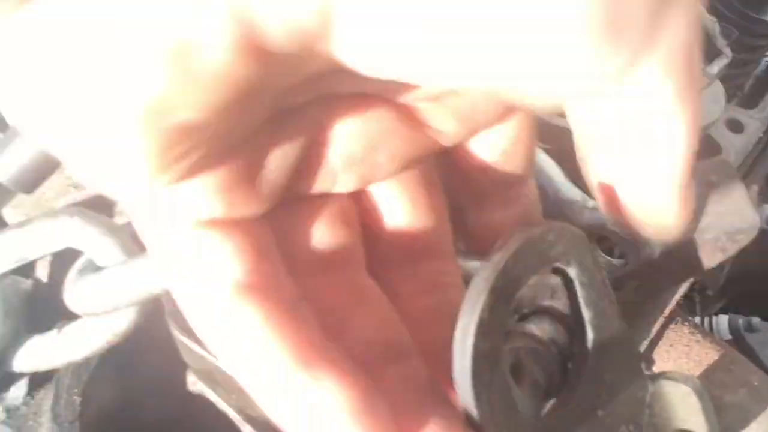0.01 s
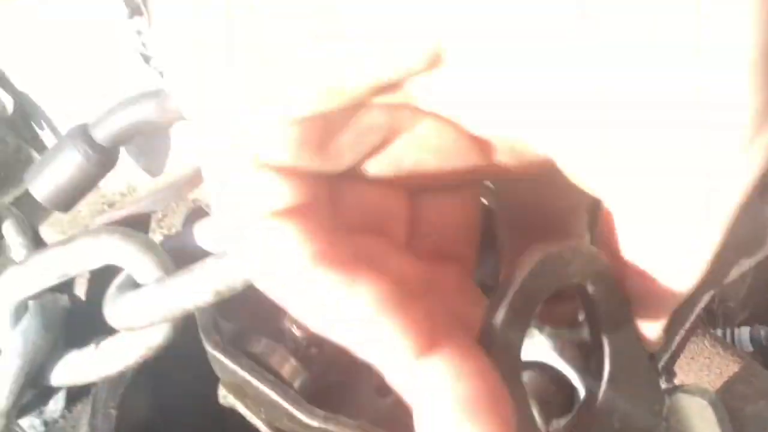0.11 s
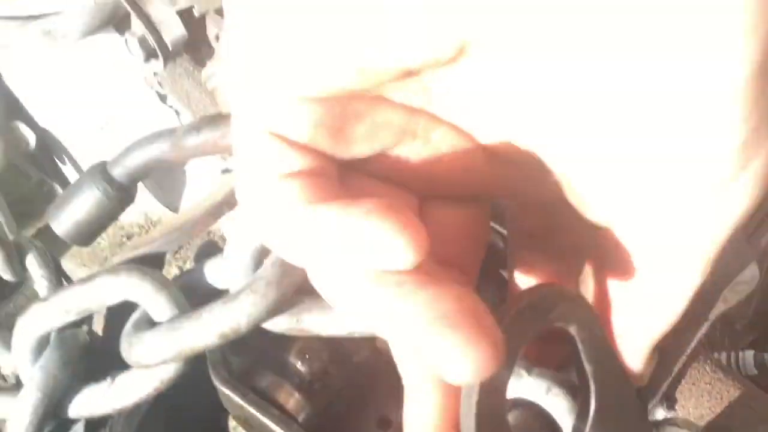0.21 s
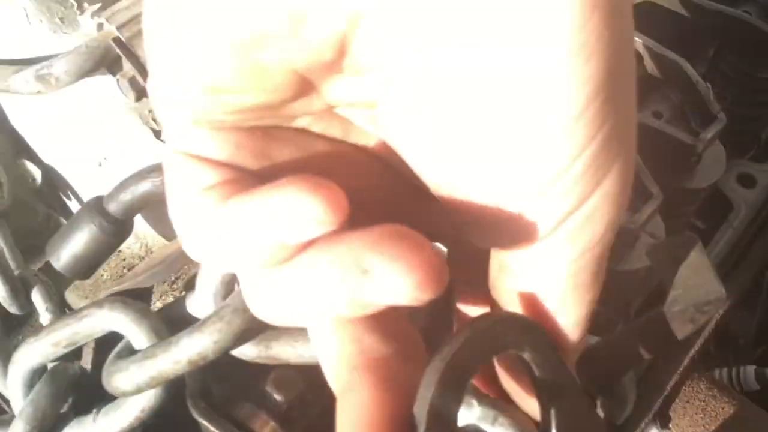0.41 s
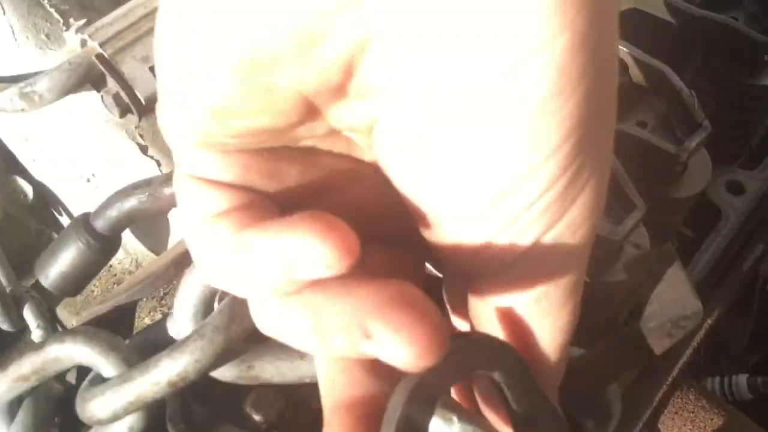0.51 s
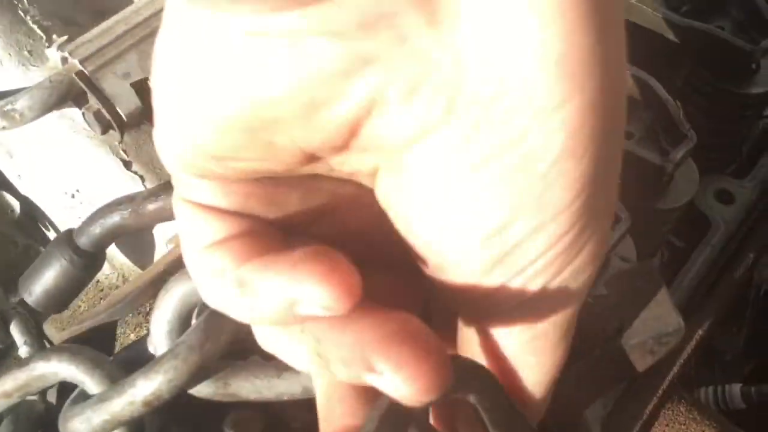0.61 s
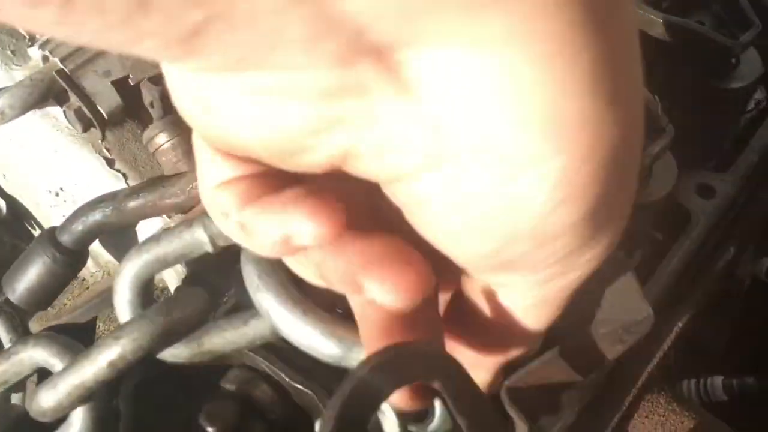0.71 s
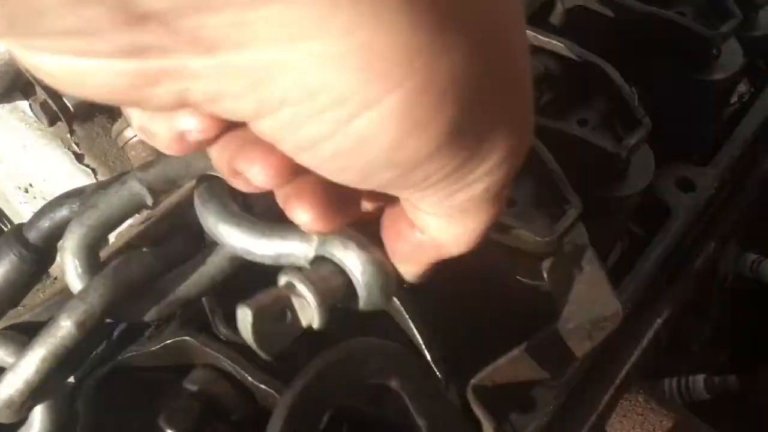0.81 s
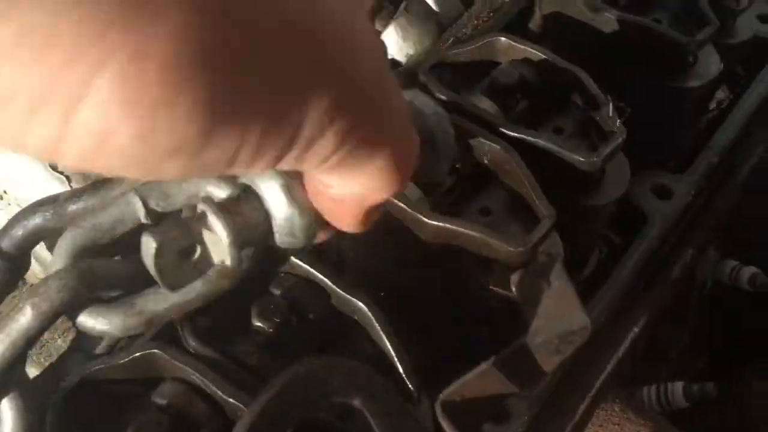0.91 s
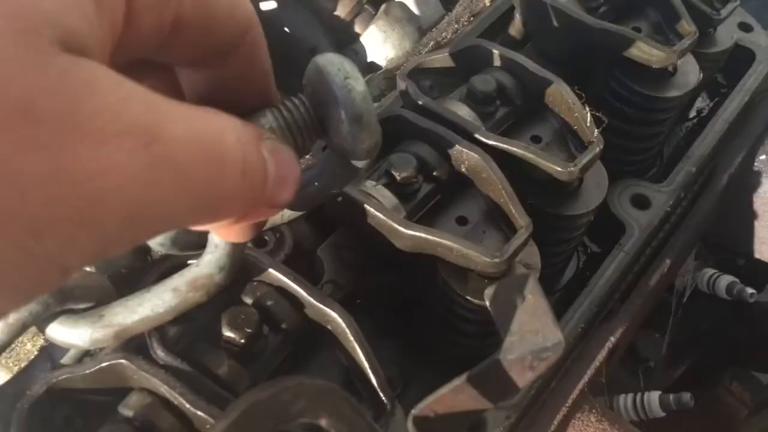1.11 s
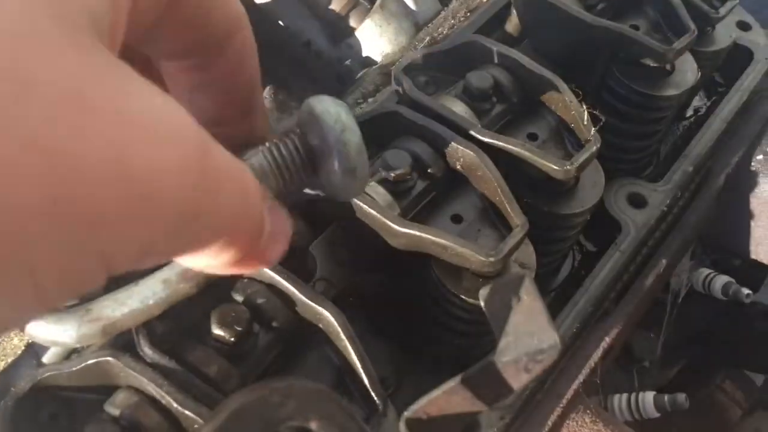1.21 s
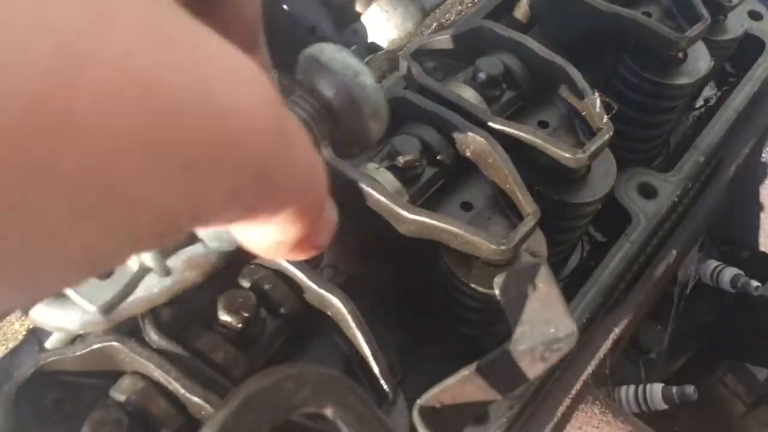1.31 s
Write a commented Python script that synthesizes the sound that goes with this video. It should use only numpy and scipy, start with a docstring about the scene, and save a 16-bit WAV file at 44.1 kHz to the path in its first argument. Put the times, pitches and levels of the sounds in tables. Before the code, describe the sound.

A thick metal chain clanks and grates in uneven bursts as it is handled over an engine.

```python
"""Outdoors, at close range, heavy steel chain links knock and slide on each other over an engine block.
Each blow is a crack of shaped noise plus decaying sine modes of the steel, two of them favoured by
where it was struck. Links in sliding contact give gritty noise in three bands that sings in the same
modes. Heavier contacts thud in the block, the blows echo off it, and a soft rumble lies under all."""
import sys
import numpy as np
from scipy import signal
from scipy.fft import rfft, irfft, next_fast_len
from scipy.io import wavfile
from scipy.ndimage import map_coordinates

SR = 44100
rng = np.random.default_rng(int(sys.argv[2]) if len(sys.argv) > 2 else 0)


def inscribe(sig):
    """Save sig as 16-bit PCM at rate SR to the path in sys.argv[1].

    A 1-D sig is mono; a 2-D sig holds one channel per row.
    Samples are clipped to [-1, 1] before scaling.
    """
    pcm = np.round(np.clip(np.atleast_2d(sig).T, -1, 1) * 32767)
    wavfile.write(sys.argv[1], SR, pcm.astype(np.int16))


def level_to_linear(level):
    """Convert decibel levels to linear amplitude factors, elementwise."""
    exponent = np.asarray(level, float) / 20
    return 10 ** exponent


N = 61740  # samples


def unit(x):
    """Normalisation: scales a signal to rms 1."""
    return x / np.sqrt(np.mean(x ** 2) + 1e-20)


def along(points, hz):
    """Frequency response: gain interpolated in dB over a logarithmic frequency axis."""
    f, db = np.transpose(points)
    return level_to_linear(np.interp(np.log(hz + 1), np.log(f + 1), db))


def noise(n, response):
    """Linear filtering: white noise multiplied by a gain spectrum, brought to rms 1."""
    m = next_fast_len(n + 4096)
    spectrum = rfft(rng.standard_normal(m)) * response(np.fft.rfftfreq(m, 1 / SR))
    return unit(irfft(spectrum, m)[:n])


def wobble(rate):
    """Slow modulation: a smooth curve through random knots, rate of them a second."""
    knots = rng.standard_normal(int(N * rate / SR) + 4)
    return map_coordinates(knots, [np.arange(N) * rate / SR])


# Spectrum of the outdoor rumble: f/Hz, relative level/dB
AIR_SPECTRUM = [(25, -50.5), (60, -26), (80, -11), (97, -2), (120, -8.5), (210, 1), (300, -1), (430, -7.5),
                (700, -10.5), (1200, -8), (1900, -16.5), (2400, -39), (16000, -62)]


def air():
    """Broadband ambient noise: a fixed spectrum whose level wavers gently."""
    level_db = -51.5 + 1.8 * wobble(9.8)
    return level_to_linear(level_db) * noise(N, lambda f: along(AIR_SPECTRUM, f))


# Heavier contacts on the engine block: t/s, level/dB
THUDS = [(0.35, -52), (.445, -39.5), (0.76, -35.5), (.785, -41), (0.822, -40.5), (0.9013, -35),
         (0.9332, -47.5), (1.0103, -51)]


def thuds():
    """Damped resonance: heavier contacts shake the block, heard as decaying noise around its pitch."""
    block_hz, width_hz, t60_s, rise_s = 315, 130, 0.12, 0.0056
    out, t = np.zeros(N + SR), np.arange(SR // 5) / SR
    for start_s, db in THUDS:
        body = noise(len(t), lambda f: f / np.hypot(block_hz ** 2 - f * f, f * width_hz))
        envelope = level_to_linear(db - 60 * t / t60_s) * (1 - np.exp(-t / rise_s))
        out[round(start_s * SR):][:len(t)] += envelope * body
    return out[:N]


# Pitches of the modes of hook and pin, then of the free link: f/Hz
HOOK_HZ = [1090, 1357, 1782, 2180, 2616, 2830, 2960, 3300, 3640, 3860, 4400, 5490, 5950, 6100, 7390, 8600,
           9100, 10949, 11610, 12050, 12490]
LINK_HZ = [4700, 4926, 6390, 6950, 7090, 10060, 10395, 12630, 13735, 15480]
# The same modes in order: relative level/dB, t60/s
HOOK_MODES = [(-17.5, 0.043), (-53.5, 0.77), (-38, 0.19), (-25.5, 0.093), (-15.5, 0.079), (-19.5, 0.037),
              (-13, 0.042), (-12.5, 0.02), (-23.5, 0.051), (-8, 0.035), (-5.5, 0.035), (-4, 0.017),
              (-18, 0.03), (-13.5, 0.012), (-4, 0.032), (-9, 0.027), (-8, 0.026), (-19, 0.12), (-11, 0.064),
              (-22, 0.098), (-27.5, 0.09)]
LINK_MODES = [(-0.5, 0.018), (-21.5, 0.1), (-1, 0.039), (-11, 0.036), (4.5, 0.021), (-1, 0.048),
              (-15, 0.11), (8, 0.036), (-0.5, 0.055), (-5, 0.061)]
MODE_HZ = np.concatenate([HOOK_HZ, LINK_HZ])
MODE_DB, MODE_T60 = np.concatenate([HOOK_MODES, LINK_MODES]).T


def resonances(f, pitches_hz, levels_db, width_hz):
    """Modal superposition: the summed gain of one resonance peak per mode."""
    return sum(level_to_linear(db) / (1 + (2 * (f - hz) / width_hz) ** 2) for hz, db in zip(pitches_hz, levels_db))


# Free-link modes that the bright scrape keeps sounding: f/Hz, level/dB
WHISTLE = [(6390, 1.8), (10200, 4), (12630, 5.3), (15480, 4)]


def whistle(f):
    """Sustained excitation: the gain that sliding adds at the free-link modes."""
    pitches_hz, levels_db = np.transpose(WHISTLE)
    return resonances(f, pitches_hz, levels_db, 250)


# Sliding: t/s, dull rub level/dB, middle level/dB, bright scrape level/dB
SLIDE = [(0, -74, -75, -78), (.05, -70.5, -72.5, -58), (.12, -60.5, -56.5, -51), (.19, -56, -61.5, -60),
         (.26, -57, -65.5, -58.5), (.33, -63.5, -81, -74), (.37, -46.5, -67, -62), (.42, -44.5, -52, -54),
         (.46, -35.5, -60, -71), (.51, -62, -62.5, -56), (.56, -48.5, -51, -62.5), (.61, -42, -53, -65),
         (.68, -66, -77, -57), (.73, -48.5, -53, -52), (.775, -38.5, -36.5, -41), (.81, -44, -42.5, -50),
         (.845, -50, -52, -55), (.89, -43.5, -35, -43.5), (.95, -41, -45.5, -58.5), (1, -40.5, -48.5, -55),
         (1.04, -47, -65.5, -60.5), (1.1, -66, -60, -65), (1.13, -72, -76.5, -85), (1.155, -73, -73, -67.5),
         (1.19, -86, -99, -98), (1.225, -76, -78, -66), (1.265, -48.5, -51.5, -56),
         (1.31, -62.5, -88.5, -69), (1.36, -61, -71.5, -60.5), (1.4, -44, -61, -65)]
# Spectra of dull rub, middle and bright scrape: f/Hz, relative level/dB
RUB = [(300, -23), (600, -3), (1000, 8), (2000, 6.5), (3900, 1), (4600, -12), (6000, -36.5)]
MIDDLE = [(3000, -21), (4200, 4), (6000, 3.5), (7600, -6), (9000, -28)]
SCRAPE = [(6500, -33.5), (8200, -1.5), (10500, 3.5), (12600, -0.5), (15500, -10.5), (16500, -20.5)]
# How strongly rub, middle and scrape sing in the modes: level/dB
SING_DB = (-7.5, 6, -1)


def contact_ticks():
    """Impulse train: small contacts at random instants, each decaying, on a steady floor of 1."""
    ticks_per_s, tick_db, size_spread_db, t60_s = 500, -11, 3, 0.01
    sizes = level_to_linear(tick_db + size_spread_db * rng.standard_normal(N))
    contacts = (rng.random(N) < ticks_per_s / SR) * sizes
    decay = level_to_linear(-60 * np.arange(1000) / SR / t60_s)
    return 1 + np.convolve(contacts, decay)[:N]


def sliding():
    """Friction noise: the links drag over each other, and their modes colour each gritty band."""
    grit_db, grit_rate = 3, 300  # roughness of the contact; knots a second
    sing_width_hz = 110
    times_s, rub_db, middle_db, scrape_db = np.transpose(SLIDE)
    ticks = contact_ticks()
    bands = [(rub_db, RUB, ticks, 0), (middle_db, MIDDLE, np.sqrt(ticks), 0), (scrape_db, SCRAPE, 1, 1)]
    out = np.zeros(N)
    for (levels_db, band, grain, whistling), sing_db in zip(bands, SING_DB):
        def response(f):
            sing = 1 + level_to_linear(sing_db) * resonances(f, MODE_HZ, MODE_DB, sing_width_hz)
            return along(band, f) * sing + whistling * whistle(f)

        grit = level_to_linear(grit_db * wobble(grit_rate))
        texture = unit(grain * grit * noise(N, response))
        level_db = np.interp(np.arange(N) / SR, times_s, levels_db)
        out += level_to_linear(level_db) * texture
    return out


def shake(touch, t):
    """Contact modulation: random shaking of each ring that dies away as touching links part."""
    knots_per_s, part_s = 250, 0.022
    knots = rng.standard_normal((len(touch), knots_per_s // 5))  # t spans a fifth of a second
    return signal.resample(knots, len(t), axis=1) * touch * np.exp(-t / part_s)


def ringing(t, gain, chatter_s):
    """Modal decay: each mode is a sine with an early faster decay while the parts still touch."""
    rough_db, rough_rad, rough_hz = 3, 0.97, 3480  # shaking is full above this pitch
    early_db, early_share = 6, 0.25  # level of the faster part; its share of the t60
    free_t60_s = 0.08  # modes that ring longer than this lack the faster part
    rise_s = 0.00064 + chatter_s
    touch = np.minimum(MODE_HZ / rough_hz, 1)[:, None]
    t60 = MODE_T60[:, None]
    early = np.exp(-(t60 / free_t60_s) ** 2) * level_to_linear(early_db - 60 * t / (early_share * t60))
    fade = level_to_linear(-60 * t / t60) + early
    start_phase = rng.random((len(MODE_HZ), 1))
    phase = 2 * np.pi * (MODE_HZ[:, None] * t + start_phase) + rough_rad * shake(touch, t)
    modes = level_to_linear(rough_db * shake(touch, t)) * fade * np.sin(phase)
    return (gain @ modes) * (1 - np.exp(-t / rise_s))


# Spectrum of the crack before its tilt: f/Hz, relative level/dB
CRACK = [(120, -66.5), (200, -19.5), (1840, 2), (4350, 1), (5520, 4), (9930, -9), (11700, -9), (16000, -29)]


def cracking(t, bright_db, favoured_hz, t60_s, chatter_s):
    """Impact noise: many small contacts make a sharp snap and a noise body."""
    body_db, chatter_db, chatter_rate = -11.5, 2.5, 600  # rate in knots a second
    snap_db, snap_t60_s, soften_db_per_s = 0.5, 0.0029, 3996.5  # longer chatter blunts the snap
    tilt, lean_db, lean_width = 0.38, 1.5, 0.1  # lean width is a share of pitch

    def response(f):
        slope = level_to_linear(tilt * bright_db * np.tanh(np.log((f + 1) / 6500) / 0.37))
        near = sum(np.exp(-(np.log((f + 1) / hz) / lean_width) ** 2) for hz in favoured_hz)
        return along(CRACK, f) * slope * (1 + level_to_linear(lean_db) * near)

    body = level_to_linear(-60 * t / max(t60_s, 0.003)) * (1 - np.exp(-t / (chatter_s + 1e-5)))
    snap = level_to_linear(snap_db - soften_db_per_s * chatter_s - 60 * t / snap_t60_s)
    grit_db = chatter_db * signal.resample(rng.standard_normal(chatter_rate // 5), len(t))
    return level_to_linear(body_db + grit_db) * (body + snap) * noise(len(t), response)


# Blows: t/s, relative crack level/dB, favoured low mode f/Hz, its level/dB, favoured high mode f/Hz,
# its level/dB, crack t60/s, contact chatter/s, relative free-link level/dB
BLOWS = [(0.1748,-29.5,1357,-53.5,4850,-51,0.047,0.0015,-94),
         (0.2075,-1.5,4700,-13.5,12900,1,0.015,0.00049,-18),
         (0.2258,-20,1782,-46.5,3860,-37.5,0.035,0.0011,-88.5),
         (0.2468,-30,5950,-51,8600,-46,0.036,0.00081,-77),
         (0.3605,-34.5,1782,-47.5,3640,-45.5,0.042,0.0016,-100),
         (0.425,-10,2180,-27,5490,-19,0.044,0.00054,-53),
         (0.427,-10,11610,-35.5,7020,-31,0.022,0.00032,-64),
         (0.444,-20,3300,-18,3860,-25.5,0.04,0.00092,-80), (.454,-40,1357,-40.5,1782,-42,.03,.003,-80),
         (0.4448,-16.5,4926,-32,9100,-20,0.018,0.0027,-65), (0.448,-9,2616,-21,3640,-23,0.035,0.0037,-49),
         (0.5473,-12,7230,-14.5,12490,-18,0.022,0.0012,-52.5),
         (0.565,-22,3640,-36,13100,-40,.015,0.00032,-61.5),
         (0.5739,-11,5845,-19.5,8570,-22.5,0.025,0.00032,-49),
         (0.5755,-42,1090,-30.5,7100,-19.5,.02,0.00061,-71.5),
         (.592,-21,3860,-33,10949,-25.5,0.0071,0.00082,-75.5),
         (0.595,-29.5,12050,-37.5,11610,-31.5,0.02,0.0015,-88),
         (0.6416,-28.5,2960,-41,1782,-57,0.017,.0003,-101),
         (0.716,-32,2830,-48,3860,-53,0.011,0.00044,-89.5),
         (0.742,-18.5,3860,-33,6100,-35,0.014,0.0017,-71.5),
         (0.7554,-0.5,5490,-7,11610,-16,0.046,0.00016,-26),
         (.763,-5.5,2830,-24.5,11610,-28,0.063,0.0032,-39),
         (.794,-15,3340,-23,4900,-40,0.017,0.00053,-52.5),
         (0.799,-17.5,6120,-50.5,12630,-53,0.025,0.0013,-47.5),
         (0.823,-23.5,5910,-36,2190,-62,0.022,0.00052,-54.5),
         (0.8782,-13,7390,-21.5,12670,-24.5,0.011,0.0012,-51.5),
         (0.903,-1.5,3860,-17,5490,-12.5,0.027,0.00064,-41),
         (0.9046,-27,11610,-26.5,10949,-47.5,0.017,0.00053,-63.5),
         (0.934,-0.5,2173,-24.5,11660,-19.5,0.046,0.00062,-27),
         (0.935,-17,5490,-8,10949,-38,.02,0.00042,-60.5),
         (0.9361,-7.5,1400,-45,1090,-48,0.035,0.00034,-79.5),
         (0.9634,4,10070,-7.5,12780,-13,0.032,0.004,-19), (0.967,-15,2616,-28.5,6100,-23,0.022,0.00103,-59),
         (1.0109,-5,4926,-29,12630,-24,0.037,0.00046,-37.5),
         (1.1,-40.5,6040,-53.5,6890,-46.5,0.021,0.0011,-75),
         (1.388,-9.5,4926,-42,6530,-33,0.016,0.00039,-49.5)]


def blows():
    """Impact excitation: every blow cracks and rings the steel modes, two of them favoured."""
    others_db, favour_width, scatter_db = -20, 0.018, 5  # hook modes re crack; share of pitch; spread
    bright_db = 36  # blows that ring the free link closer than this to their crack are brighter
    out, t = np.zeros(N + SR), np.arange(SR // 5) / SR
    in_link = np.arange(len(MODE_HZ)) >= len(HOOK_MODES)
    for start_s, db, low_hz, low_db, high_hz, high_db, t60_s, chatter_s, link_db in BLOWS:
        part_db = np.where(in_link, link_db, db + others_db)
        gain = level_to_linear(MODE_DB + part_db + scatter_db * rng.standard_normal(len(MODE_HZ)))
        for hz, favoured_db in ((low_hz, low_db), (high_hz, high_db)):
            gain = gain + level_to_linear(favoured_db) * np.exp(-(np.log(MODE_HZ / hz) / favour_width) ** 2)
        ring = ringing(t, gain, chatter_s)
        crack = cracking(t, link_db - db + bright_db, (low_hz, high_hz), t60_s, chatter_s)
        out[round(start_s * SR):][:len(t)] += ring + level_to_linear(db) * crack
    return out[:N]


def radiated(blow_signal):
    """Radiation efficiency: small parts radiate little bass; the microphone limits the top."""
    band = signal.butter(2, [1100, 15200], "band", fs=SR, output="sos")  # Hz
    return signal.sosfilt(band, blow_signal)


# Reflections off the engine block: delay t/s, level/dB
ECHOES = [(.0021, -25.5), (.0047, -27), (.009, -30.5), (0.012, -28)]


def near_echoes(hits):
    """Specular reflection: weak delayed copies of the blows."""
    return sum(level_to_linear(db) * np.pad(hits, (round(delay_s * SR), 0))[:N] for delay_s, db in ECHOES)


def scene():
    """Linear superposition: rumble, thuds, sliding, and blows with their near echoes."""
    hits = radiated(blows())
    return (air() + thuds() + sliding() + hits + near_echoes(hits))[None]


def top_cut(x):
    """Nothing passes above the cut-off."""
    return signal.sosfilt(signal.butter(12, 16660, fs=SR, output="sos"), x)


def record(dry):
    """Saturation and high-pass filtering: the loudest cracks clip softly, then the low end is cut."""
    clipped = dry / (1 + np.abs(dry) ** 6) ** (1 / 6)
    low_cut = signal.butter(3, 64, "high", fs=SR, output="sos")  # Hz
    mix = signal.sosfilt(low_cut, clipped)
    return top_cut(mix)


dry = scene()
out = record(dry)
inscribe(out)
```